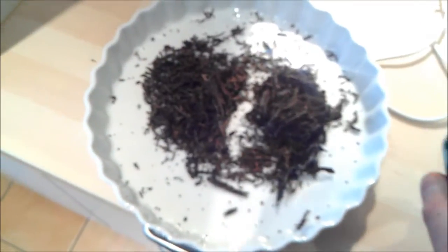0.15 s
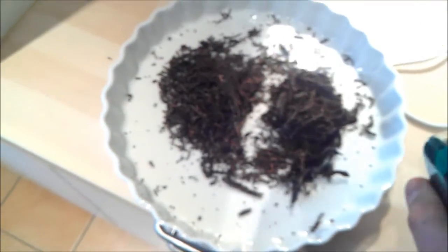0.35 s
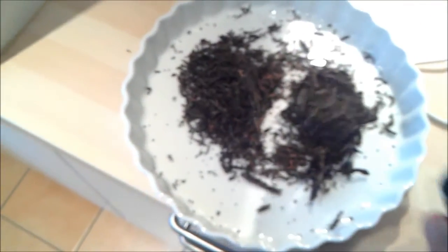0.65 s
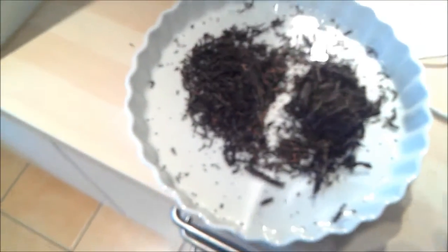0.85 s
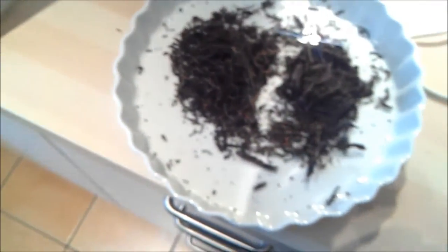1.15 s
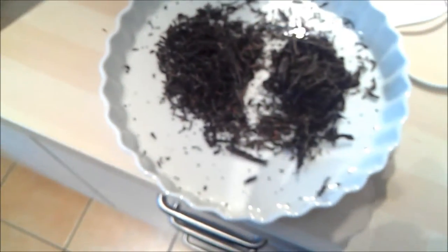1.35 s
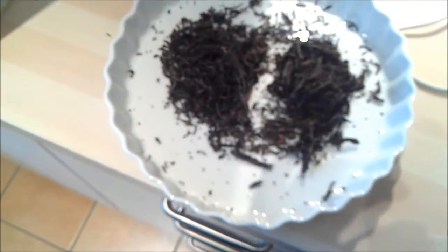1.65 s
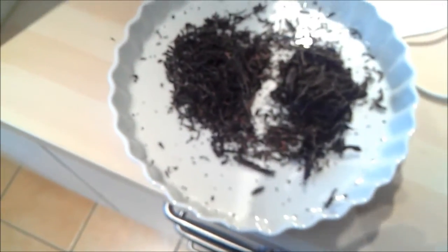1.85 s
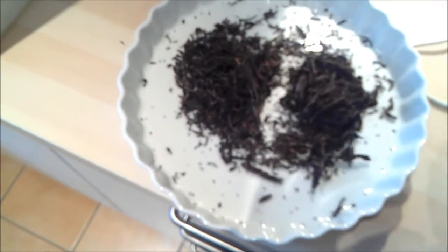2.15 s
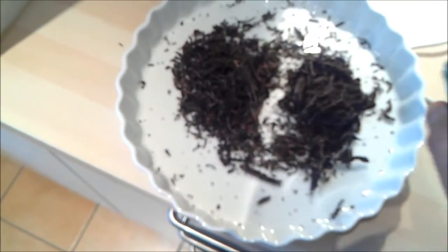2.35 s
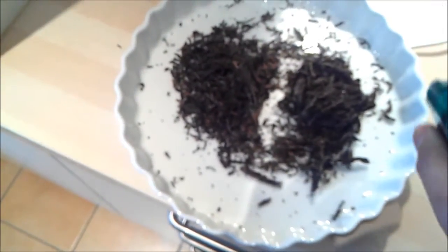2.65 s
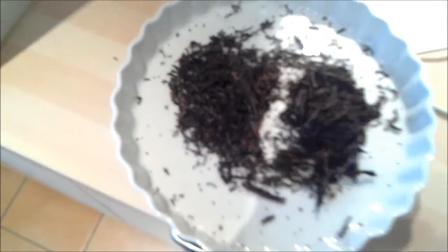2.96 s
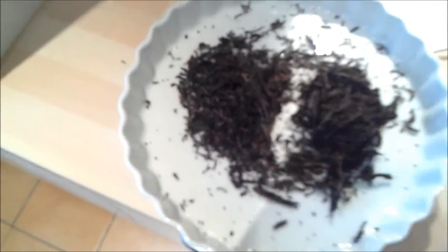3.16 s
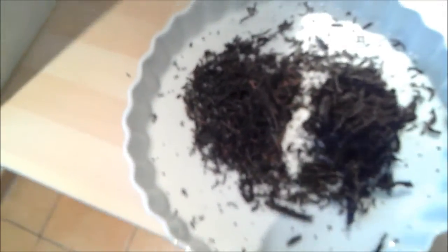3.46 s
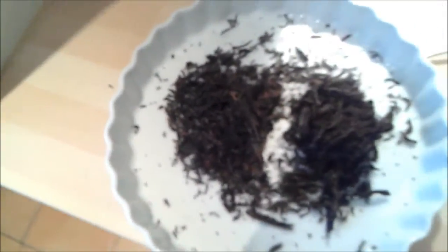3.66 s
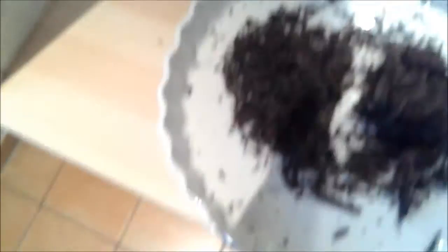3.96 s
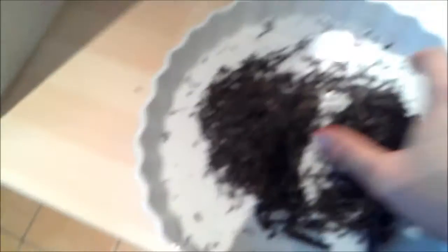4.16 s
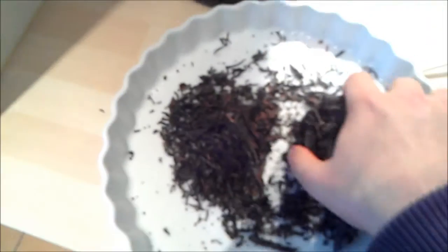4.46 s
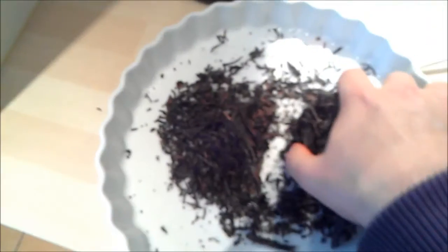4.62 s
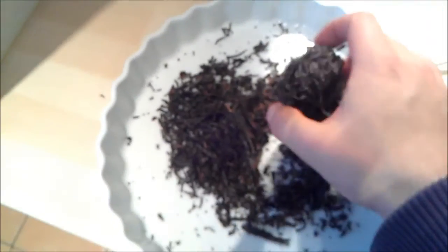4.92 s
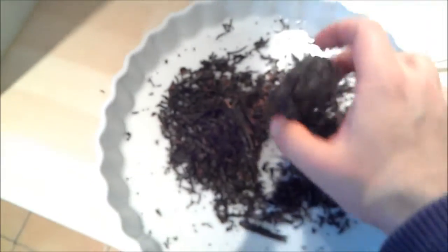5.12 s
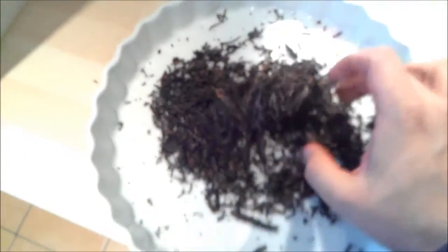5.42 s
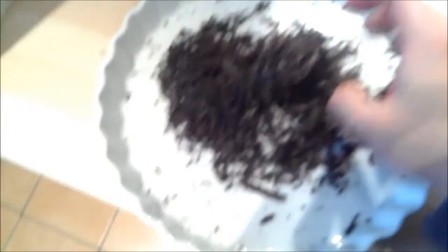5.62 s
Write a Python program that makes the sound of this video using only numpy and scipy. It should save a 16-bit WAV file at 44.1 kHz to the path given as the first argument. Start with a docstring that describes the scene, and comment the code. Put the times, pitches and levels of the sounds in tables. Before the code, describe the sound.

In a kitchen, a spray bottle is pumped rapidly, set down with one loud knocking thud, then fingers rustle dry tobacco very quietly.

```python
"""A hand pumps a trigger spray bottle over a dish of dry tobacco in a tiled kitchen, right of a hand-held camera.
Each pull is a puff of droplet-rough noise; between puffs the trigger scrapes and its spring tones ring,
while early on fingers tap two low modes of the camera body (one more tap comes near the end).
A sleeve crackles in, the bottle lands on the worktop in seven ringing, cracking contacts with rocking noise,
then fingers crackle and snap the dry leaves. Soft room tone and hiss lie under it all."""
import sys
import numpy as np
from scipy import signal
from scipy.fft import rfft, irfft, next_fast_len
from scipy.io import wavfile
from scipy.ndimage import uniform_filter1d

SR = 44100
rng = np.random.default_rng(int(sys.argv[2]) if len(sys.argv) > 2 else 0)


def wrap_up_sound(samples):
    """Save the sound to the file named by the first command line argument, as 16-bit audio."""
    columns = np.atleast_2d(samples).T
    # keep every value between -1 and 1, then stretch to whole-number steps
    tamed = np.clip(columns, -1, 1)
    steps = np.round(tamed * 32767).astype(np.int16)
    wavfile.write(sys.argv[1], SR, steps)


N = 255206
T = np.arange(N) / SR
LEFT_LAG_SAMPLES = 2

# loudness of the fingers in the leaves: (time [s], level [dB])
FINGERS = [(4.7, -86.5), (4.85, -80), (5.25, -78.5), (5.334, -77.5), (5.458, -65.5), (5.54, -78),
           (5.562, -59.5), (5.618, -70.5), (5.787, -69.5)]


def undb(db):
    """Turn decibels into gain."""
    return 10 ** (np.asarray(db) / 20)


def unit(x):
    """Scale each channel to an RMS of 1."""
    return x / np.sqrt(np.mean(x ** 2, axis=-1, keepdims=True))


def colour(x, points, modes=(), between_db=0):
    """Shape the spectrum by (Hz, dB) points, times a floor between_db plus (Hz, width, dB) resonances."""
    size = next_fast_len(x.shape[-1], True)
    hz = np.fft.rfftfreq(size, 1 / SR) + 1  # 1 Hz up, so that the logarithm exists
    at, db = np.transpose(points)
    slope = undb(np.interp(np.log(hz), np.log(at), db))
    peaks = sum(undb(g) / (1 + (2 * (hz - f) / w) ** 2) for f, w, g in modes)
    gain = slope * (undb(between_db) + peaks)
    return irfft(rfft(x, size) * gain, size)[..., :x.shape[-1]]


def butter(sound, order, hz, kind):
    """Filter with a Butterworth low-, high- or band-pass."""
    return signal.sosfilt(signal.butter(order, hz, kind, fs=SR, output="sos"), sound)


def fade(t, t60):
    """Exponential decay from t = 0, falling 60 dB in t60 seconds (3 ms at least)."""
    return (t >= 0) * np.exp(-np.log(1000) * np.maximum(t, 0) / max(t60, .003))


def add(into, s, sound):
    """Mix a short sound in at time s."""
    i = int(s * SR)
    into[i:i + len(sound)] += sound[:len(into) - i]


def envelope(rows):
    """Gain along a (time, dB) curve, silent outside it, with edges smoothed over 3 ms."""
    at, db = np.transpose(rows)
    inside = (T >= at[0]) * (T <= at[-1])
    return uniform_filter1d(undb(np.interp(T, at, db)) * inside, size=132)


def grit(spread_db, size):
    """Noise whose loudness wanders to a new random value every few samples, as with droplets or crumbs."""
    jumps = undb(spread_db * np.clip(rng.standard_normal(N // size + 1), -2, 2))
    return rng.standard_normal(N) * uniform_filter1d(np.repeat(jumps, size)[:N], size=size)


def spray():
    """The jet tears into droplets at the nozzle; the harder the pull, the more low end."""
    # pulls of the trigger: (start [s], length [s], peak level [dB])
    squirts = [(-0.04, 0.11, -43.5), (0.338, 0.12, -45.5), (0.725, .1, -45.5), (1.075, 0.11, -43.5),
               (1.434, 0.088, -46.5), (1.775, 0.1, -48), (2.11, 0.084, -46.5), (2.429, 0.11, -46.5),
               (2.805, 0.059, -51), (3.093, 0.1, -45), (3.416, 0.089, -43.5)]
    # spectrum of the jet: (frequency [Hz], gain [dB])
    jet_curve = [(530, -100), (900, -25), (1380, -11), (1500, -12), (2050, -7), (2320, -2.5), (3320, 3.5),
                 (4170, 2.5), (4520, -5), (5380, 4), (7960, -19.5), (10300, -48.5), (17500, -120)]
    # resonances of the nozzle: (frequency [Hz], width [Hz], gain [dB])
    nozzle = [(2043, 77, 1), (3350, 140, -22), (4510, 190, 1.5), (4770, 250, 3)]
    # each pull opens fast, swells to its peak, sags and shuts
    open_s, open_db, peak_share = 0.0027, -8.5, 0.41
    sag_db, shut_db_per_s = -7.5, -800
    full_low_end_db = -20  # pull level at which the low end comes through whole

    jet = unit(colour(grit(0.73, size=40), jet_curve, nozzle))
    low = butter(jet, 3, 2000, "low")
    pull = 0
    for s, length, db in squirts:
        share = (T - s) / length
        swell = open_db * (1 - share / peak_share) ** 2
        sag = sag_db * ((np.minimum(share, 1) - peak_share) / (1 - peak_share)) ** 2
        shape_db = np.where(share < peak_share, swell, sag)
        shut_db = shut_db_per_s * np.maximum(T - s - length, 0)
        pull = pull + np.clip((T - s) / open_s, 0, 1) * undb(db + shape_db + shut_db)
    low_gain = (pull / undb(full_low_end_db)) ** .6
    return pull * (jet - low + low * low_gain)


def trigger():
    """Plastic slips for some ms with a fading rattle, and two spring tones ring on unevenly."""
    # trigger clicks: (time [s], scrape level [dB], spring pitch [Hz], upper spring pitch [Hz],
    # slip length [s], then over the scrape: spring [dB], upper spring [dB], rattle [dB])
    clicks = [(0.1646, -59, 1950, 5250, 0.017, 7.5, -18, -14),
              (0.182, -50.5, 3080, 5580, 0.014, -0.5, -9, -28),
              (0.2817, -49, 3218, 6040, 0.0096, 7.5, 11, -20), (0.598, -70.5, 3080, 5100, 0.011, 2, 0, -19),
              (0.6582, -60.5, 3060, 5100, 0.0063, 12.5, 10, -7.5),
              (0.924, -72, 2060, 4530, 0.012, 9, -8, -18), (0.9393, -47.5, 3184, 5070, 0.011, 7, -22, -6),
              (1.283, -60, 2010, 5000, 0.0054, 3.5, -17, -12), (1.3048, -44, 3117, 5280, 0.0077, 4, 9, -7),
              (1.378, -48.5, 3143, 5250, 0.015, 11.5, 19, 3),
              (1.651, -64.5, 2790, 5020, 0.0092, -5, 8, -12),
              (1.711, -43.5, 2980, 5320, 0.0073, -12, -3, -36),
              (2.0106, -57, 5060, 6000, 0.0076, 1, 6, -13),
              (2.0674, -46.5, 3130, 6010, 0.0068, 3, 8.5, -22),
              (2.2788, -44, 3700, 5900, 0.024, 5, -6, 2.5), (2.654, -55.5, 2980, 5200, 0.004, 7, -11, -11),
              (2.735, -51.5, 3200, 5960, 0.0076, 6, 0.5, -12),
              (2.9682, -52.5, 2950, 5080, 0.0068, 2, 10.5, -15),
              (3.048, -50, 3160, 5210, 0.0054, 0.5, -5, -13),
              (3.296, -45.5, 2580, 4950, 0.011, -19, -2, -13.5), (3.335, -77, 3240, 5070, 0.012, -6, 4, -8),
              (3.377, -49, 3000, 5160, 0.0053, -15, 6, -15),
              (3.606, -49.5, 3104, 5740, 0.014, 2, 8.5, -24.5)]
    # spectrum of the plastic scrape: (frequency [Hz], gain [dB])
    scrape_curve = [(530, -68), (900, -24), (1990, -22.5), (2280, -20), (3110, -10), (4200, -12.5),
                    (5230, -5), (6170, -8.5), (7960, -38), (10300, -50.5), (17500, -120)]
    spring_t60_s, upper_t60_s, rattle_t60_s = 0.14, .055, 0.26
    waver_rad, flutter_db = .65, 3.5  # RMS unevenness of the spring tones' phase and level

    out, t = np.zeros(N), np.arange(SR // 4) / SR
    scrape = unit(colour(grit(5.0, size=60), scrape_curve))
    wobble = unit(uniform_filter1d(rng.standard_normal((2, N)), size=150))
    rise = np.minimum(t / .004, 1)
    for s, db, hz, upper_hz, slip, spring_db, upper_db, rattle_db in clicks:
        i = int(s * SR)
        slide = np.where(t < slip, 1, fade(t - slip, 0.0099))
        rattle = undb(rattle_db) * fade(t, rattle_t60_s)
        rub = (slide + rattle) * scrape[i:i + len(t)]
        shake, drift = wobble[:, i:i + len(t)]
        spring_tone = np.sin(2 * np.pi * hz * t + waver_rad * drift)
        upper_tone = np.sin(2 * np.pi * upper_hz * t + waver_rad * shake)
        spring = undb(spring_db) * fade(t, spring_t60_s) * spring_tone
        upper = undb(upper_db) * fade(t, upper_t60_s) * upper_tone
        add(out, s, undb(db) * rise * (rub + (spring + upper) * undb(flutter_db * shake)))
    return butter(out, 2, 1500, "high")


def grip():
    """Fingers shifting on the camera body give dull taps through two modes of its housing."""
    # taps: (time [s], lower mode level [dB], upper mode level [dB])
    finger_taps = [(0.141, -54, -60), (0.367, -46.5, -51), (0.388, -44, -68), (0.413, -44, -60),
                   (0.446, -51, -55), (0.511, -43, -52), (0.535, -45.5, -78), (0.586, -49, -49),
                   (0.615, -64, -66), (0.655, -44, -49), (0.677, -61, -67), (0.703, -40, -39),
                   (0.724, -43.5, -41.5), (0.753, -50, -43), (5.007, -42, -62.5)]
    lower_hz, lower_t60_s = 278, 0.031
    upper_hz, upper_t60_s = 419, 0.024

    out, t = np.zeros(N), np.arange(SR // 8) / SR
    lower = fade(t, lower_t60_s) * np.sin(2 * np.pi * lower_hz * t)
    upper = fade(t, upper_t60_s) * np.sin(2 * np.pi * upper_hz * t)
    rise = np.minimum(t / .004, 1)
    for s, db, upper_db in finger_taps:
        add(out, s, rise * (undb(db) * lower + undb(upper_db) * upper))
    flicker = unit(uniform_filter1d(rng.standard_normal(N), size=200))
    return out * undb(0.48 * flicker)


def drop():
    """Each contact rings the worktop's modes in a new mix and cracks; rocking feeds the same modes with noise."""
    # bottle on the worktop: (time [s], ring level [dB], crack level [dB])
    blows = [(3.988, -17.5, 0.5), (4.011, -14, -24.5), (4.044, -21, -21), (4.109, -19.5, -14),
             (4.139, -30.5, -33.5), (4.179, -38, -31), (4.244, -25.5, -22.5)]
    # worktop modes, detuned and rebalanced at each contact: (central pitch [Hz], central level [dB], t60 [s])
    worktop = [(287.1, -1.5, 0.22), (331.4, 1, 0.16), (393, 6, 0.029), (461.7, 1.5, 0.042), (462, 2, 0.062),
               (534.7, -18, 0.13), (565.3, 4.5, 0.13), (623.4, 2.5, 0.093), (691.7, -4.5, 0.14),
               (744, -3, 0.087), (904, -8.5, 0.1), (864.6, 0.5, 0.036), (993, -2, 0.061), (1143, -6, 0.02)]
    # spectrum of the crack: (frequency [Hz], gain [dB])
    crack_curve = [(88, -65.5), (150, -50), (301, -17.5), (539, -19), (1340, -5.5), (1510, -8), (1670, -10),
                   (1810, -6.5), (3960, -14), (5900, -19.5), (7960, -45), (10300, -81.5), (17500, -120)]
    rumble_curve = [(150, -25.5), (250, 15), (900, 13.5), (3000, -22.5)]  # (Hz, dB)
    crack_t60_s, clatter_t60_s, clatter_db = .03, 0.28, -3.5  # clatter level is over the crack
    shake_db, shake_t60_s = 2.5, 0.29  # rocking after each contact, over its ring level

    body, crack, shake_power = np.zeros((3, N))
    t = np.arange(SR // 2) / SR
    chance = rng.standard_normal((len(blows), len(worktop), 2))
    rise = np.minimum(t / 0.0057, 1)
    for (s, db, crack_db), mix in zip(blows, chance):
        ring = 0
        for (hz, mode_db, t60), (level_chance, pitch_chance) in zip(worktop, mix):
            tone = np.sin(2 * np.pi * hz * (1 + 0.027 * pitch_chance) * t)
            gain = undb(mode_db + 1.3 * level_chance) * np.sign(pitch_chance)
            ring = ring + gain * fade(t, t60) * tone
        add(body, s, undb(db) * rise * ring)
        clatter = undb(clatter_db) * fade(t, clatter_t60_s)
        add(crack, s, undb(crack_db) * (fade(t, crack_t60_s) + clatter))
        add(shake_power, s, (undb(db + shake_db) * rise * fade(t, shake_t60_s)) ** 2)
    # a mode that dies sooner is a wider resonance
    resonances = [(hz, np.log(1000) / np.pi / t60, db) for hz, db, t60 in worktop]
    rumble = unit(colour(grit(3.1, size=400), rumble_curve, resonances, between_db=-13.5))
    return body + np.sqrt(shake_power) * rumble + colour(crack * rng.standard_normal(N), crack_curve)


def leaves():
    """A dense crackle of cloth, then of crumbs, with a few crisp snaps of band-passed noise."""
    # spectrum of the crackle: (frequency [Hz], gain [dB])
    crackle_curve = [(940, -50.5), (1600, -13), (2180, -12), (2560, -17), (2950, -10.5), (3330, -12),
                     (4120, -5), (5850, -8), (7960, -36.5), (10300, -61.5), (17500, -120)]
    # loudness of the sleeve sweeping in before the drop: (time [s], level [dB])
    sleeve = [(3.62, -63), (3.64, -62), (3.722, -69.5), (3.795, -67), (3.81, -58), (3.93, -49),
              (3.989, -36.5)]
    # crisp snaps of leaf: (time [s], level [dB], centre [Hz])
    snaps = [(5.4325, -67.5, 5460), (5.557, -60, 5470), (5.5744, -60, 4900), (5.642, -62.5, 3860),
             (5.6562, -60, 5030), (5.688, -72.5, 4760), (5.709, -57, 2070)]
    sleeve_low_hz, snap_t60_s = 2620, 0.039

    crackle = unit(colour(grit(4.6, size=30), crackle_curve))
    airy = butter(crackle, 4, sleeve_low_hz, "high")
    out = envelope(sleeve) * airy + envelope(FINGERS) * crackle
    t = np.arange(SR // 8) / SR
    for (s, db, hz), noise in zip(snaps, rng.standard_normal((len(snaps), len(t)))):
        snap = unit(butter(noise, 2, [hz / 1.4, hz * 1.4], "band"))
        add(out, s, undb(db) * fade(t, snap_t60_s) * snap)
    return out


def air():
    """Room tone and microphone hiss: slowly swaying noise, partly shared by both sides."""
    # spectrum of the room tone: (frequency [Hz], gain [dB])
    air_curve = [(12, -30), (20, -17), (33, -40.5), (107, -56.5), (181, -42.5), (257, -21.5), (375, -15.5),
                 (436, -15), (1280, -21.5), (1600, -22.5), (4050, -21), (7200, -36.5), (7960, -63.5),
                 (10300, -100.5), (17500, -120)]
    air_db = -71

    shared, left, right = colour(rng.standard_normal((3, N)), air_curve)
    sway = undb(0.32 * unit(uniform_filter1d(rng.standard_normal(N), size=4000)))
    left_mix = 0.57 * shared + 0.86 * left
    right_mix = 0.64 * np.roll(shared, -LEFT_LAG_SAMPLES) + 0.76 * right
    return undb(air_db) * unit(np.array([left_mix, right_mix])) * sway


def kitchen(count=4):
    """Per side: a tail that dies band by band, and several patterns of sparse echoes off worktop and dish."""
    # decay of the room: (band centre [Hz], t60 [s])
    room_t60 = [(250, 0.44), (500, 0.42), (1000, 0.46), (2000, 0.29), (4000, 0.29), (7000, 0.24)]

    t = np.arange(SR // 2) / SR
    shared, left, right = rng.standard_normal((3, len(t)))
    tail = np.zeros((2, len(t)))
    for hz, t60 in room_t60:
        alike = np.clip(1.05 - hz / 1800, .2, .97)  # low bands are more alike on both sides
        sides = alike * shared + np.sqrt(1 - alike ** 2) * np.array([left, right])
        tail += butter(sides, 2, [hz / 2 ** .5, hz * 2 ** .5], "band") * fade(t - .006, t60)
    near, shape = t[:SR // 16], (count, 2, SR // 16)
    sparse = rng.standard_normal(shape) * (rng.random(shape) < .4)
    early = sparse * fade(near - .0004, .04)
    return unit(tail) / np.sqrt(len(t)), unit(early) / np.sqrt(len(near))


def heard(sound, pan_db, room_db, early_db):
    """Place a source in the kitchen, pan_db louder on the left, which it reaches later; near echoes keep shifting."""
    shift_s = .025  # hands move, and the near echoes change about this fast

    tail, early = kitchen()
    path = undb(room_db) * tail
    path[[0, 1], [LEFT_LAG_SAMPLES, 0]] += 1  # direct sound
    size = int(shift_s * SR)
    blend = rng.standard_normal((len(early), N))
    blend = uniform_filter1d(uniform_filter1d(blend, size), size)
    blend = blend / np.sqrt(np.sum(blend ** 2, axis=0))
    echoes = signal.oaconvolve((sound * blend)[:, None], early, axes=2).sum(axis=0)[:, :N]
    wet = signal.oaconvolve(sound[None], path, axes=1)[:, :N] + undb(early_db) * echoes
    return wet * undb(np.array([[.5], [-.5]]) * pan_db)


def scene():
    """Place every source in the kitchen and lay them over the room tone."""
    sleeve_pan_db, fingers_pan_db = -4.5, -10
    clicks = heard(trigger(), pan_db=-3.5, room_db=-8, early_db=-6)
    taps = heard(grip(), pan_db=-.4, room_db=-18, early_db=-8)
    puffs = heard(spray(), pan_db=-5, room_db=-9.5, early_db=0)
    landing = heard(drop(), pan_db=0.54, room_db=-13.0, early_db=-2)
    hand_pan_db = np.where(T < FINGERS[0][0], sleeve_pan_db, fingers_pan_db)
    rustle = heard(leaves(), pan_db=hand_pan_db, room_db=-15.0, early_db=-2.6)
    return puffs + landing + clicks + taps + rustle + air()


def record(dry):
    """The left gets slightly more low end than treble; bass cut, rounded peaks, top cut, small constant offsets."""
    ceiling, top_hz = .52, 8100
    # constant offset of each side, left then right: (offset [full scale])
    side_offset = np.array([[.00076], [.00137]])

    dry = np.array([colour(dry[0], [(700, 0.7), (4000, 0.081)]), dry[1]])
    thin = butter(dry, 3, 230, "high")
    soft = ceiling * np.tanh(thin / ceiling)
    soft = butter(soft, 1, 120, "high")
    top_cut = signal.ellip(6, .2, 30, top_hz, fs=SR, output="sos")
    return side_offset + signal.sosfilt(top_cut, soft)


dry = scene()
out = record(dry)
wrap_up_sound(out)
```